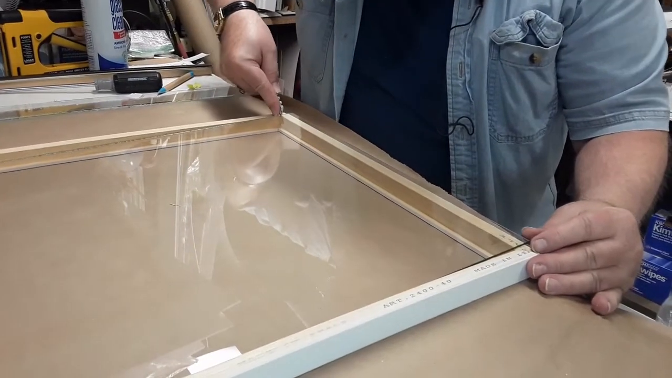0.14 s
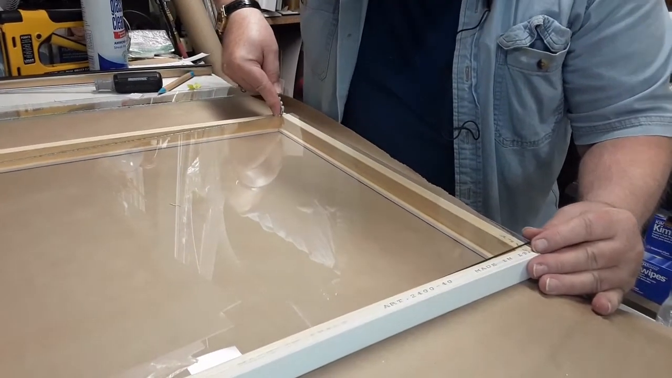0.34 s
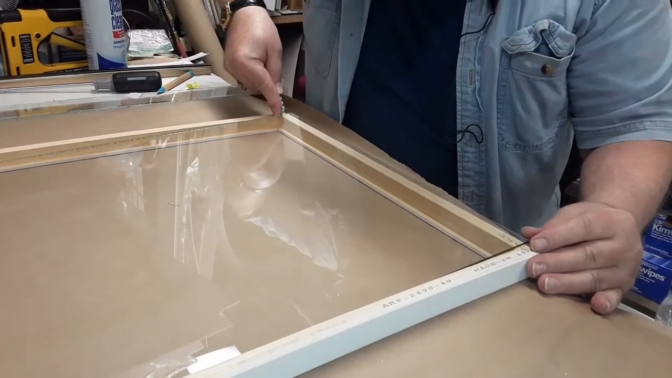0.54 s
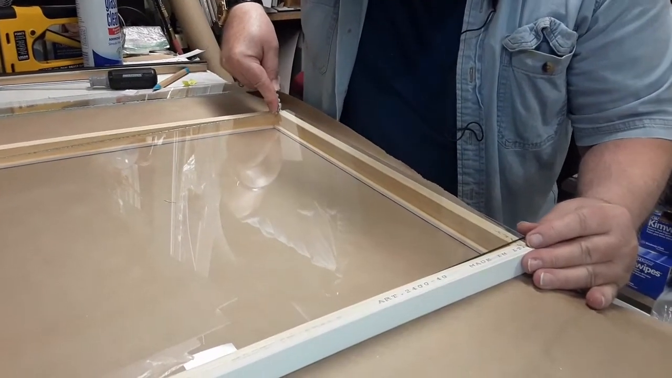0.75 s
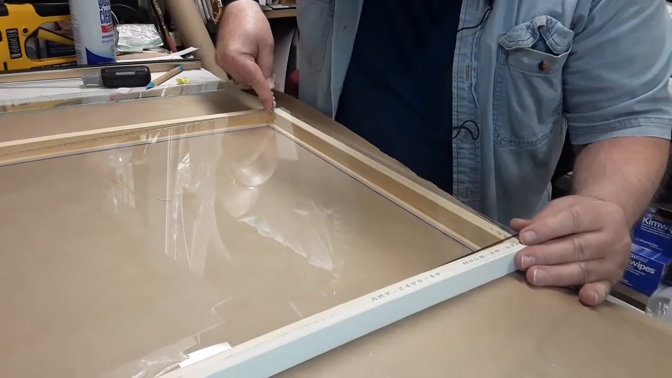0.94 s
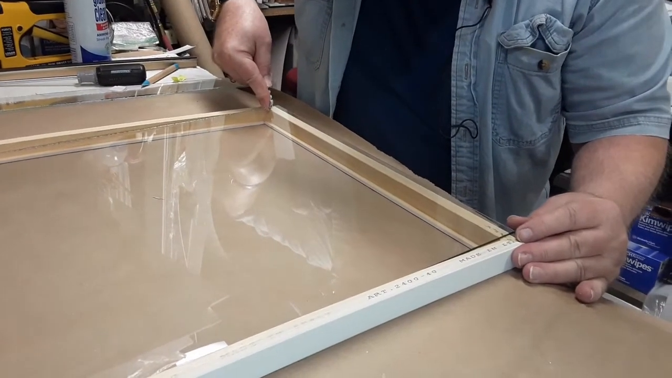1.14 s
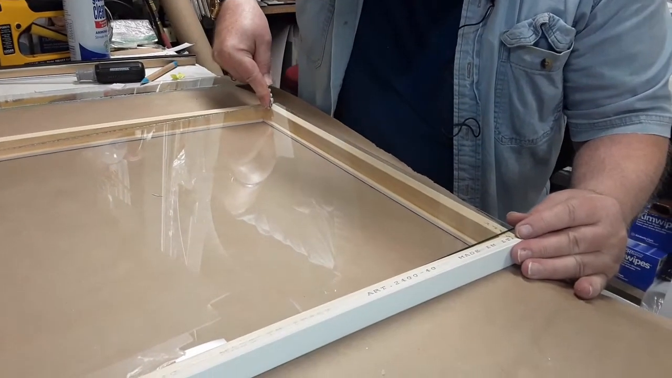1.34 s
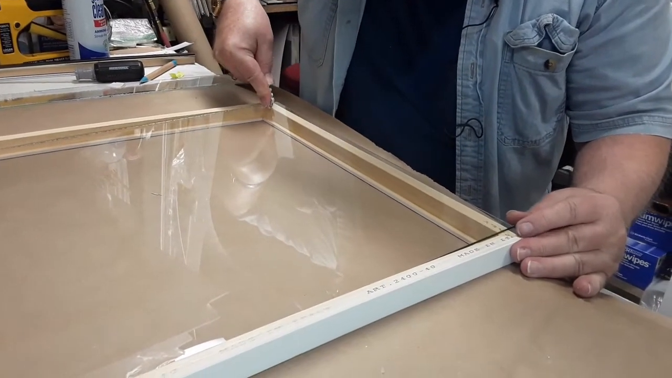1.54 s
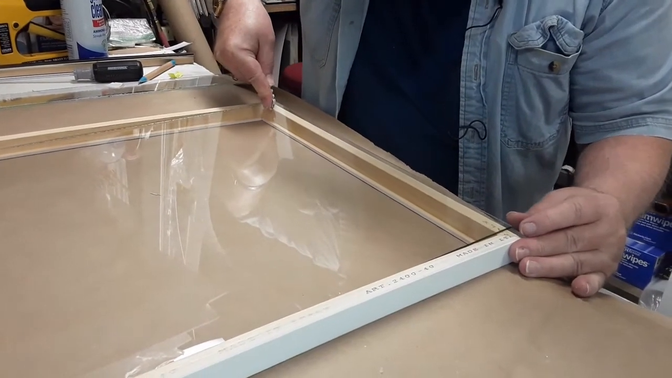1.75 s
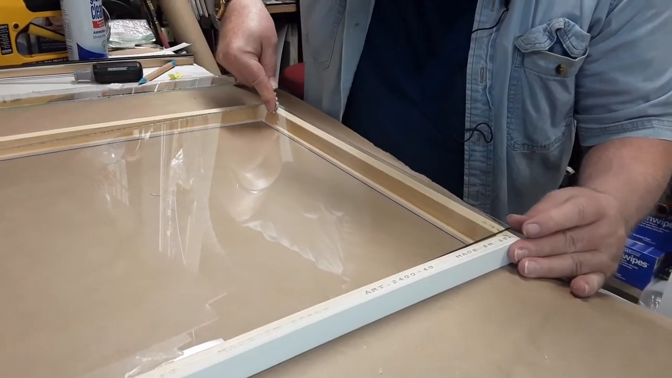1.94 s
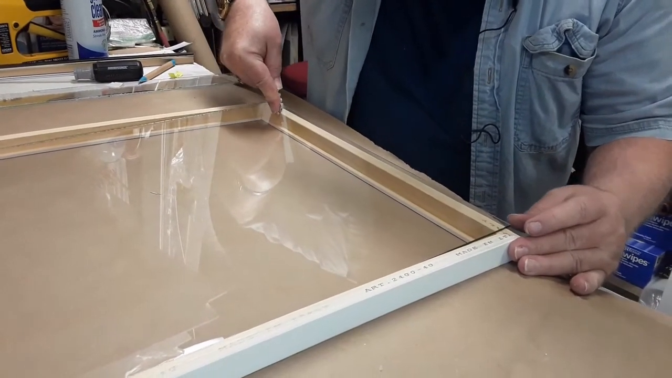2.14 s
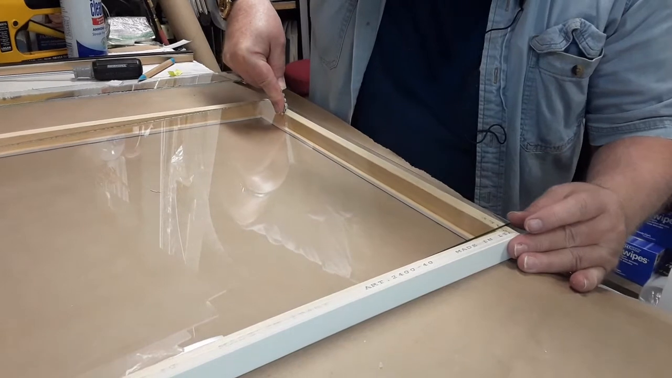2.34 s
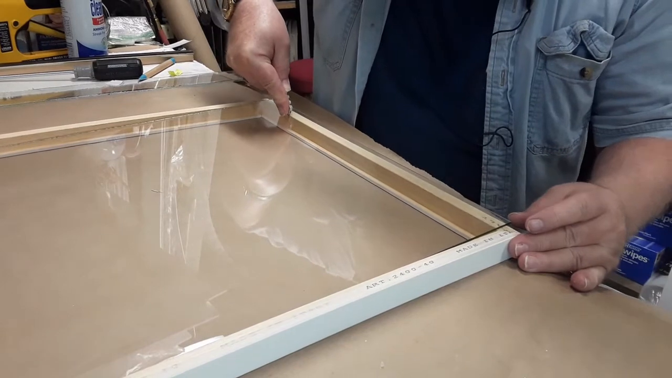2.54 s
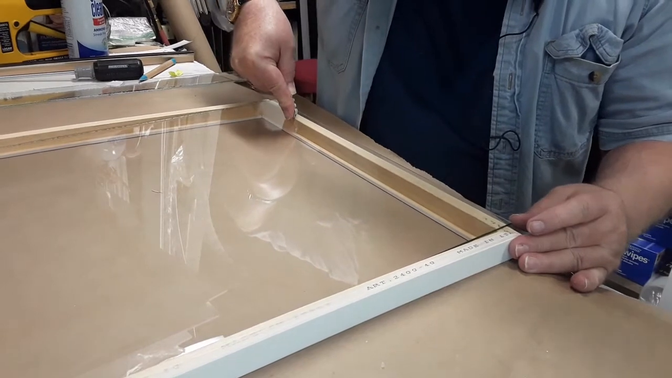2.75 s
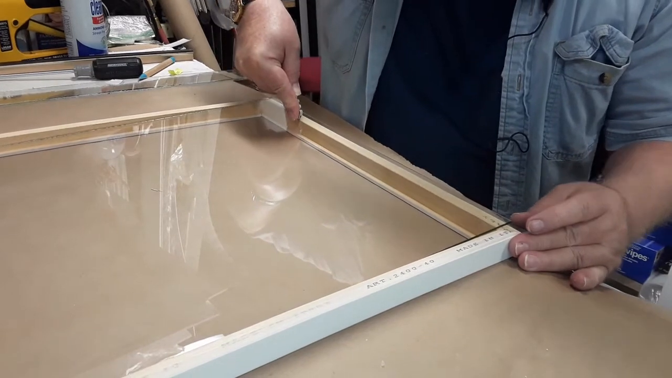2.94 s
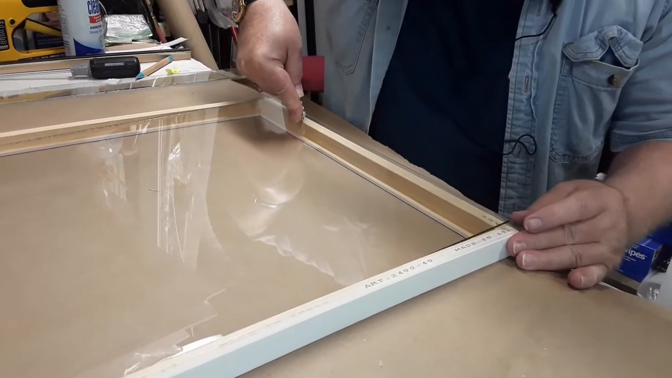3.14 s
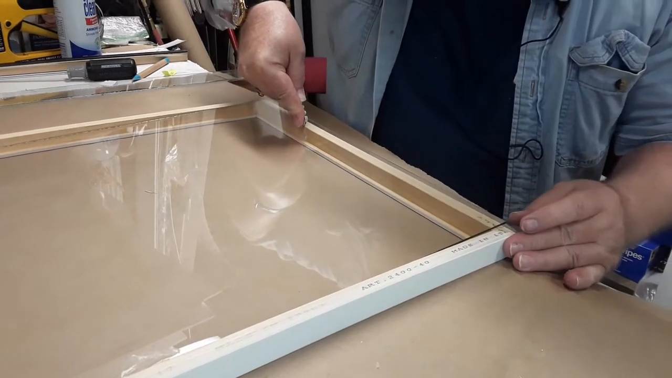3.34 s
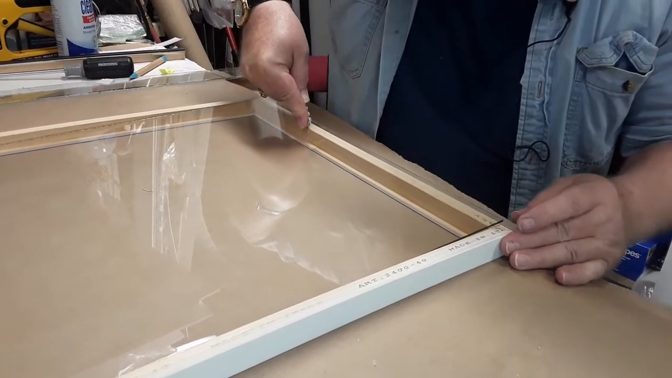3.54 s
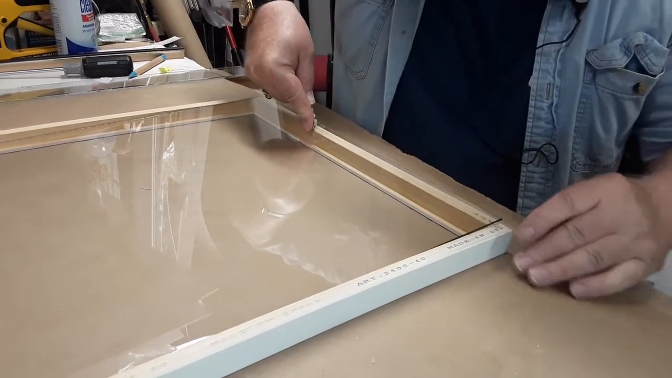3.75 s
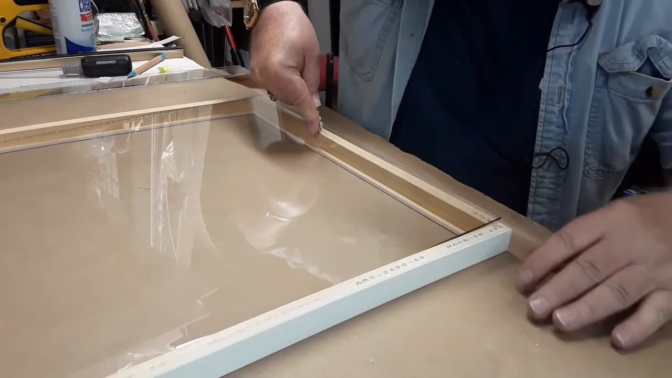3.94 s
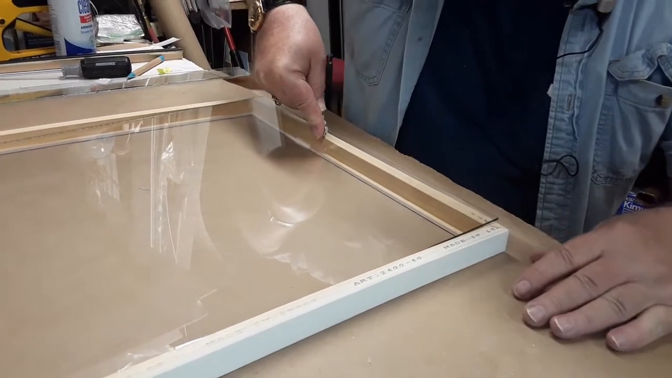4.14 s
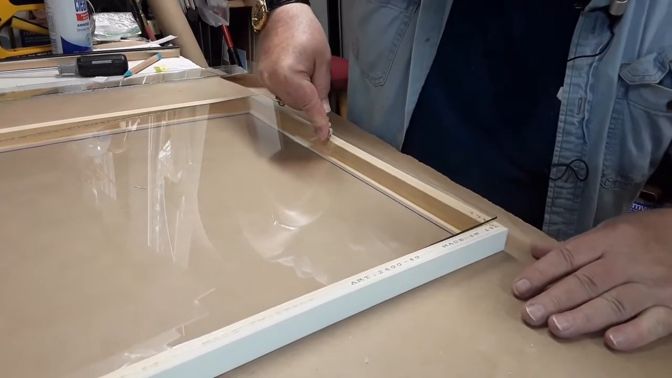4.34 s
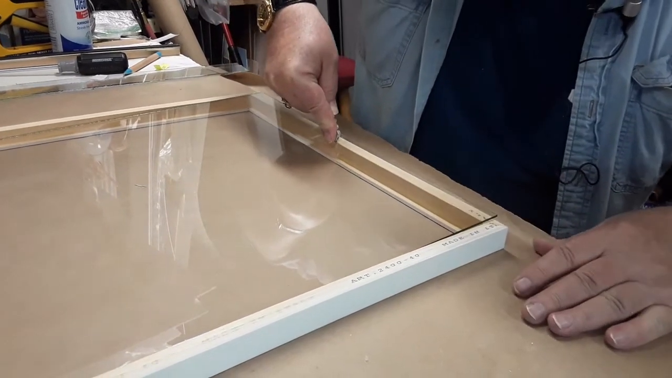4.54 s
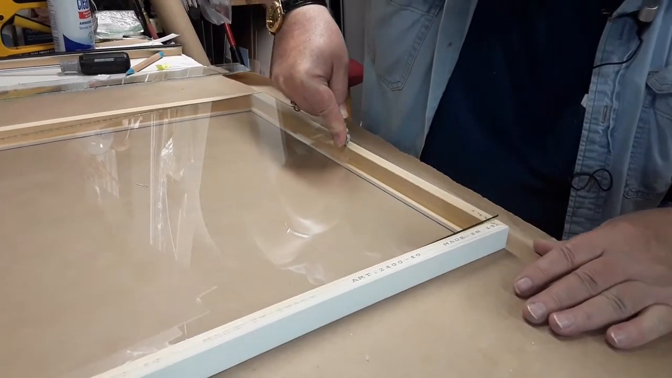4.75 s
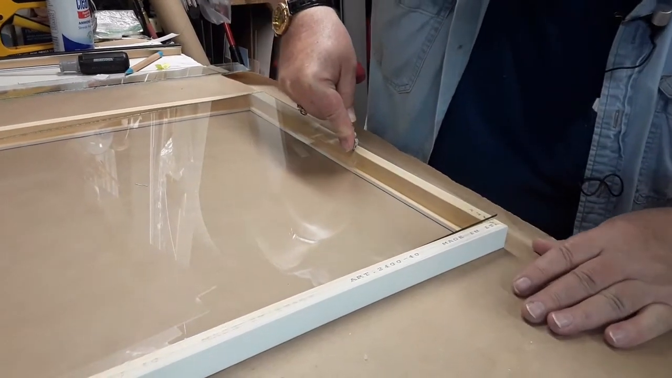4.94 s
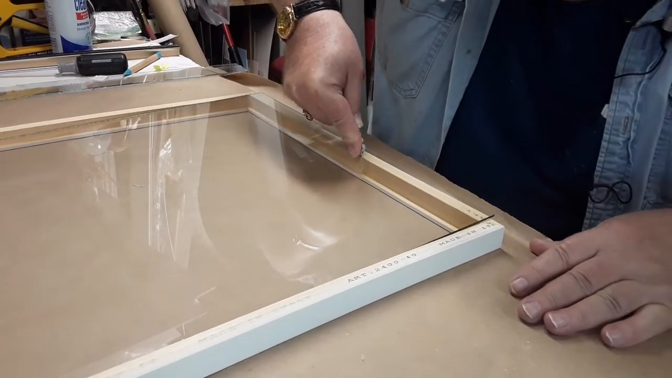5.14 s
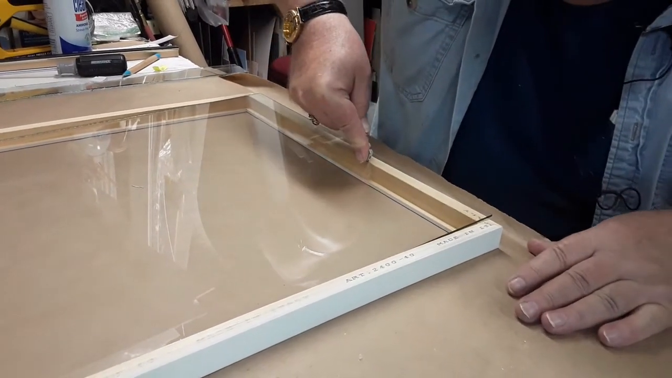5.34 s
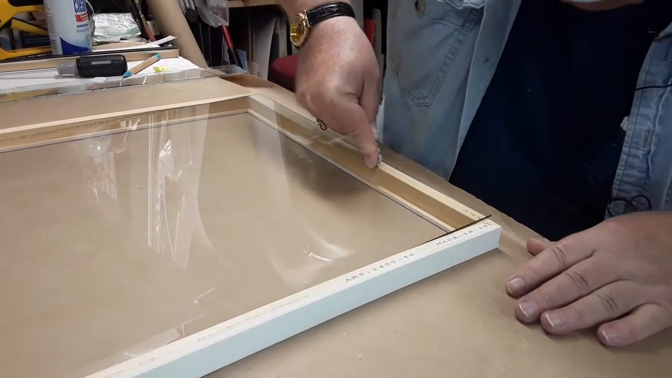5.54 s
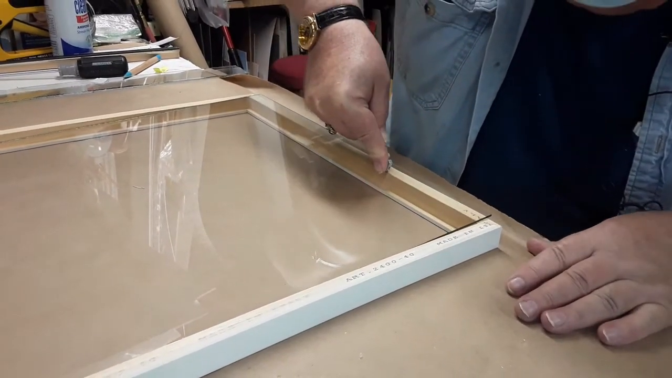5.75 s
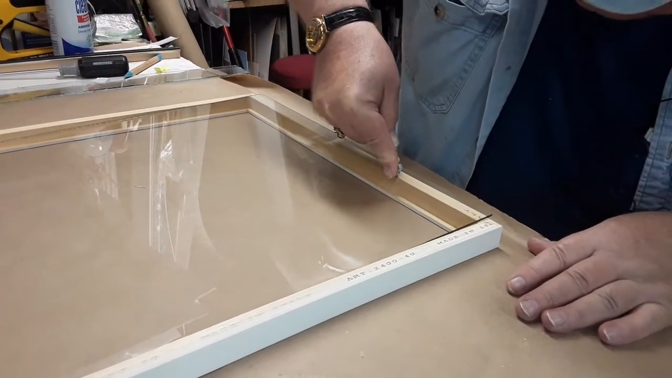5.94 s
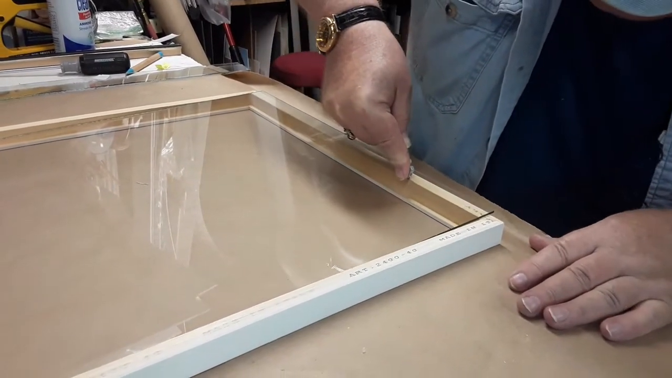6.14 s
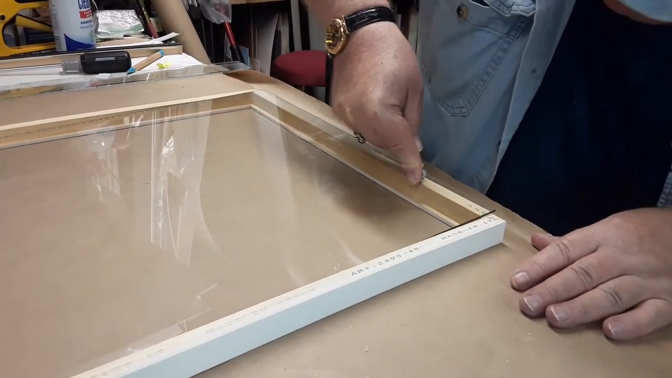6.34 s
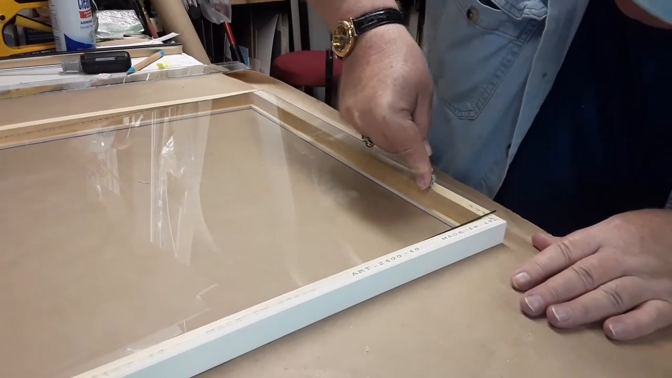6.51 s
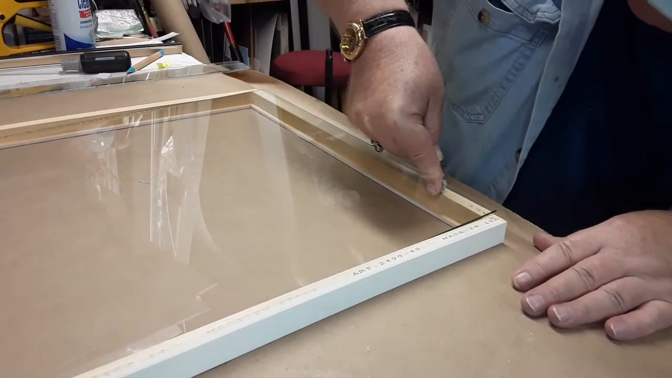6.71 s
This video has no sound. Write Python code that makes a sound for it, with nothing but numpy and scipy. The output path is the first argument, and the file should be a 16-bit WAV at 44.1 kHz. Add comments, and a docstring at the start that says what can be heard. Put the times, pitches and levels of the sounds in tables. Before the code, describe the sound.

A glass cutter ticks against a pane, then scores it with a long, gritty, high hiss over a faint workshop hum.

```python
"""Scoring a pane of glass

A hand-held glass cutter bites into a pane on a workbench. Its wheel first moves in separate slips,
then runs on as a hiss of tiny cracks that stalls and judders. The cracks make the pane ring, and the
tone pulses and swirls as the wheel travels. Now and then the glass chirps under the load or knocks
on the bench. A motor and a fan hum in the small workshop."""
import sys
import numpy as np
from scipy import signal
from scipy.fft import rfft, irfft
from scipy.io import wavfile
from scipy.ndimage import uniform_filter1d

SR = 44100
rng = np.random.default_rng(int(sys.argv[2]) if len(sys.argv) > 2 else 0)


def dump_mix(stems):
    """Bounce the given channels to the path in sys.argv[1] as a 16-bit WAV at rate SR."""
    frames = np.atleast_2d(stems).T  # one column per channel
    limited = np.clip(frames, -1, 1)  # hard clip at full scale
    pcm = np.round(limited * 32767).astype(np.int16)
    wavfile.write(sys.argv[1], SR, pcm)


N = 298878
TIME = np.arange(N) / SR
CREEP_START_S, RUN_START_S = 1.55, 1.819  # the wheel starts to creep, then to run

# the wheel bites and stops again: (time [s], length [s], relative level [dB])
WHEEL_SLIPS = [(0.247, 0.0041, -63), (0.583, 0.0032, -43.5), (0.729, 0.016, -32.5), (0.747, 0.007, -32),
               (0.867, 0.0029, -29), (0.873, 0.0048, -30), (1.171, 0.0039, -34.5), (1.187, 0.017, -35.5),
               (1.268, 0.0084, -35), (1.289, 0.0088, -33.5), (1.383, 0.023, -33), (1.418, 0.025, -30),
               (1.451, 0.0071, -29), (1.5305, 0.0056, -27.5), (1.584, 0.0063, -27.5), (1.6057, 0.0035, -29),
               (1.6743, 0.004, -26.5), (1.681, 0.0055, -29.5), (1.704, 0.013, -24.5), (1.7215, 0.0066, -32),
               (1.7345, 0.004, -27), (1.747, 0.007, -27), (1.763, 0.006, -30), (1.771, 0.0047, -24.5),
               (1.791, 0.0034, -27)]
# the strength of the running stroke: (time [s], relative level [dB])
STROKE_LEVEL = [(1.83, -26), (1.9, -26), (1.93, -27), (2.21, -25), (2.89, -27), (3.0, -25.5), (3.25, -26.5),
                (5.3, -25.5), (5.57, -25.5), (5.64, -25), (6.65, -26), (6.77, -24.5)]
# the wheel catches for a moment: (time [s], length [s])
WHEEL_STALLS = [(1.834, 0.0066), (1.919, 0.0046), (1.974, 0.01), (2.035, 0.014), (2.075, 0.0088),
                (2.575, 0.0095), (2.598, 0.013), (2.634, 0.0075), (2.889, 0.018), (2.916, 0.0083),
                (3.059, 0.0085), (3.736, 0.0095), (3.806, 0.01), (3.918, 0.0092), (4.122, 0.0072),
                (4.227, 0.0074), (4.864, 0.007), (5.909, 0.008), (6.143, 0.0084), (6.251, 0.0083),
                (6.536, 0.007)]
# how much the wheel judders: (time [s], depth [0-1])
JUDDER_DEPTH = [(1.8, 0.3), (2.9, 0.56), (3.1, 0.83), (3.5, .42), (3.8, 0.5), (5, 0.42), (6.75, 0.76)]
# where the wheel is: (time [s], distance from the starting edge [m])
WHEEL_PATH = [(0, .036), (1.5, .037), (1.8, .038), (2.2, .0562), (2.6, .0812), (3, .1013), (3.5, .1261),
              (4, .1568), (5, .2259), (5.5, .2634), (6, .2964), (6.4, .3258), (6.8, .3517)]
# the pane's broad tone colour: (pitch [Hz], relative level [dB])
PANE_COLOUR = [(470, -65), (800, -25), (1570, -12.5), (1970, -9), (2380, -10.5), (3380, -6), (4630, -17.5),
               (5110, -9.5), (5940, -7.5), (6570, -4.5), (7360, -5), (8440, 2), (10200, -14),
               (12000, -15.5), (16000, -28.5)]
# its sharper rings and the hollows between them: (pitch [Hz], width [Hz], lift [dB])
PANE_RINGS = [(1840, 90, 2), (2020, 110, 2.5), (2390, 90, -3.5), (2680, 60, -3), (2818, 70, 5.5),
              (3247, 50, 2.5), (3440, 110, 3.5), (5235, 140, 3), (6110, 110, -3.5), (6300, 80, 2.5),
              (6700, 140, 7), (7320, 130, -4), (7495, 50, 3.5), (7850, 180, 2.5), (8530, 140, 5),
              (8770, 90, 4), (9070, 60, 2.5), (9470, 90, 2.5), (10400, 250, -5), (10920, 130, 8),
              (11380, 110, 6), (11700, 90, 4), (12050, 110, 6), (13850, 400, -6), (14400, 400, 3)]
# standing waves that the wheel crosses: (lowest pitch [Hz], highest pitch [Hz], crest spacing [m],
# place of one crest [m], swing near an edge [dB], swing mid-pane [dB], mean near an edge [dB],
# mean mid-pane [dB])
STANDING_WAVES = [(1850, 2300, .0565, .0425, 2.1, 1, -.6, .6), (2650, 3100, .0543, .036, 1.2, .5, -1.6, .8),
                  (3150, 3750, .0495, .041, .5, 2.3, -2.2, 1.3), (5000, 5900, .0302, .0111, 1.6, 1, 0, 0),
                  (7400, 8250, .0239, .0117, 2, 2.6, -.7, .9)]
# swells around the 6.7 kHz ring: (time [s], lift [dB])
LOW_RING_SWELL = [(1.86, 6), (2.02, 5.5), (2.14, -4.5), (2.38, 4), (2.62, -4.0), (2.9, 8), (3.14, -3.5),
                  (3.34, 2.5), (3.94, -2), (4.1, 4.5), (4.46, 1), (4.9, 4), (5.06, 1.5), (5.46, 1),
                  (5.7, 0), (5.94, 1), (6.34, 1.5), (6.5, -6), (6.62, -0.5), (6.77, 4.5)]
# swells around the 8.6 kHz ring: (time [s], lift [dB])
HIGH_RING_SWELL = [(1.86, 0.5), (1.98, -7), (2.14, 1.0), (2.38, -3), (2.58, 1.5), (2.82, -3.5), (2.98, 2.5),
                   (3.14, 3.5), (3.26, -3), (4.14, 1.0), (4.62, -5.5), (4.78, -0.5), (4.98, -5),
                   (5.14, 2.5), (5.3, -4), (5.46, 0), (5.58, -3), (5.86, 2.5), (5.98, -5), (6.1, -2),
                   (6.34, -2), (6.5, -0.5), (6.66, -9), (6.77, 3)]
# swells of the top treble: (time [s], lift [dB])
TREBLE_SWELL = [(1.86, -0.5), (2.02, 1), (2.3, 0), (2.42, 0.5), (2.86, -0.5), (3.02, -1), (3.18, 0.5),
                (3.82, 1.5), (4.14, -1), (5.14, 2), (5.34, -2), (5.54, 1.5), (5.74, -2.5), (5.98, 1.5),
                (6.42, 0.5), (6.58, 2.5), (6.77, -3.5)]
# the pane ticks under the load: (time [s], peak level [dB], middle pitch [Hz], sweep time [s])
PANE_CHIRPS = [(1.287, -27.5, 1970, 0.0063), (1.3453, -33, 2170, 0.0042), (2.446, -25.5, 1680, 0.0026),
               (3.184, -21, 1860, 0.0035), (3.284, -26.5, 1810, 0.005), (3.310, -30, 1880, 0.0047),
               (3.478, -27, 1610, 0.0033), (3.885, -27, 1510, 0.0025), (4.121, -24, 1610, 0.0036),
               (4.365, -18, 2120, 0.0017), (5.2603, -25, 1870, 0.002)]
# dull knocks on the bench: (time [s], level [dB], lowest pitch [Hz], highest pitch [Hz], decay [s])
BENCH_KNOCKS = [(0.583, -36, 900, 2400, 0.022), (3.148, -25, 780, 1220, 0.0039)]
# the tones of the motor's hum: (pitch [Hz], level [dB], waver [dB])
MOTOR_TONES = [(59.2, -59.5, -3), (101.4, -54.5, 2), (139.7, -44.5, -0.6), (177.6, -58.5, 3),
               (204.2, -52.5, 3), (291, -64, 2), (759, -59.5, 2), (931, -60.5, 2), (1029, -56.5, 0),
               (1864, -59.5, 1.5)]
# the fan's tone swells and sinks: (time [s], level [dB])
FAN_LEVEL = [(0, -61), (.6, -52), (2, -51.5), (3.4, -52.5), (4, -63), (6.8, -57)]
# faint gliding tones: (time [s], length [s], first pitch [Hz], last pitch [Hz], top level [dB])
GLIDING_TONES = [(.37, .28, 492, 445, -51), (.5, .15, 598, 628, -54)]
# the tone colour of moving air: (pitch [Hz], relative level [dB])
AIR_COLOUR = [(20, -21), (35, -25), (55, -8), (90, -2), (200, 3.5), (280, -1.5), (380, 1), (500, -1.5),
              (750, -4), (1050, -1), (1400, -6), (2000, -14), (3600, -24), (6200, -45), (8300, -34),
              (10500, -52), (16000, -52)]


def wheel_slips():
    """The wheel's first bites: each opens with a sharp snap and goes on as a short crackle."""
    bite_db, settle_s, first_snap_db = 3, 0.0046, 10
    loudness = sum(undb(db + bite_db * np.exp(-abs(TIME - start) / settle_s))
                   * gate(start, length, 0.00024) for start, length, db in WHEEL_SLIPS)
    grit = unit(snaps(scatter=.25, uneven_db=1) + undb(6) * fractures(spread_db=1.5, crush_db=1.5))
    slips = undb(-1) * loudness * grit
    for start, _, db in WHEEL_SLIPS:
        slips[int(start * SR)] += undb(db + first_snap_db)
    body = band(slips, 1920, 2150)  # a bite from rest sounds fuller than the running wheel
    return slips + undb(3.5) * body


def wheel_run():
    """The rolling wheel cracks the glass, stalls and jumps on, over a steady hiss of glass dust."""
    stall_db, hitch_db, jump_db, settle_s = -15, -4, 1, 0.015
    rolling = gate(RUN_START_S, N / SR, 0.00045)
    stalled = np.clip(sum(gate(start, length - .002, 0.003) for start, length in WHEEL_STALLS), 0, 1)
    freed = sum((TIME > start + length) * np.exp(-abs(TIME - start - length) / settle_s)
                for start, length in WHEEL_STALLS)
    level_db = curve(STROKE_LEVEL) + stall_db * stalled + jump_db * freed + hitch_db * hitches()
    loudness = undb(level_db - 0.15) * judder(curve(JUDDER_DEPTH))
    grit = unit(snaps(scatter=.4, uneven_db=.6) + undb(5) * fractures(spread_db=1, crush_db=2))
    dust = unit(band(rng.standard_normal(N), 10500, 16000))
    return rolling * (loudness * grit + undb(-50) * dust)


def snaps(scatter, uneven_db, per_second=470):
    """The wheel breaks the glass in sharp snaps, a little uneven in spacing and size."""
    gaps, sizes = rng.standard_normal((N // 40, 2)).T
    starts = (np.cumsum(np.exp(scatter * gaps)) * SR / per_second).astype(int)
    return unit(np.bincount(starts, undb(uneven_db * sizes), N)[:N])


def fractures(spread_db, crush_db, per_second=9000):
    """Tiny cracks of uneven size over the fine noise of crushed glass."""
    cracks = (rng.random(N) < per_second / SR) * rng.choice([-1, 1], N)
    sizes = undb(spread_db * np.clip(rng.standard_normal(N), -2, 2))
    return unit(unit(cracks * sizes) + undb(crush_db) * rng.standard_normal(N))


def hitches(per_second=10, length_s=0.0044):
    """The wheel catches briefly at random moments; 1 while it is held."""
    starts = (rng.random(N) < per_second / SR).astype(float)
    width = int(length_s * SR)
    held = np.clip(width * uniform_filter1d(starts, width), 0, 1)
    return uniform_filter1d(held, SR // 1000)


def judder(depth, rate_hz=110, scatter=.35, uneven_db=-1.3):
    """The wheel sticks and slips: each uneven cycle swells quickly and dies down."""
    cycles = np.cumsum(rate_hz * np.exp(scatter * wander(rate_hz))) / SR
    size = undb(uneven_db * rng.standard_normal(N))[cycles.astype(int)]
    bursts = unit(size * np.sin(np.pi * np.sqrt(cycles % 1)) ** 2)
    force = 1 - depth + depth * bursts
    return force / np.sqrt(uniform_filter1d(force ** 2, SR // 24))  # keep the average level steady


def edge_echoes(force, distance, strength=1.1, reach_m=1.6, paths=60):
    """Waves return from the edges along paths that change as the wheel moves, so the tone swirls."""
    size, hop = 4096, 1024  # work on short, overlapping slices of sound
    starts = np.arange(-hop, N, hop)
    padded = np.pad(force, (hop, size))
    slices = np.array([padded[s + hop:s + 3 * hop] for s in starts]) * signal.get_window("hann", 2 * hop)
    place = distance[np.clip(starts + hop, 0, N - 1)]
    hz = np.arange(size // 2 + 1) * SR / size
    # the glass bends in waves that travel 400 m/s at 8 kHz; higher ones go faster
    radians_per_m = 2 * np.pi * np.sqrt(hz * 8000) / 400
    lengths = .35 - reach_m * np.log(1 - (np.arange(paths) + rng.random(paths)) / paths)
    growths = rng.choice([-1, 1], paths, p=[.25, .75]) * rng.uniform(.5, 2, paths)  # most paths grow
    echoes = 0
    for length, growth in zip(lengths, growths):
        phase = np.outer(length + growth * (place - place.mean()), radians_per_m).astype(np.float32)
        echoes = echoes + np.cos(phase) - 1j * np.sin(phase)
    depth = strength * np.minimum(place / .11, 1)  # the swirl is full 0.11 m from the edge
    response = 1 + depth[:, None] * echoes / np.sqrt(paths)
    # the echoes only move energy between pitches about 700 Hz apart or less
    bins = int(700 * size / SR)
    nearby_power = uniform_filter1d(abs(response) ** 2, bins, axis=1)
    response /= np.sqrt(uniform_filter1d(nearby_power, bins // 2, axis=1))
    out = np.zeros(N + 2 * size)
    for start, echoed in zip(starts + hop, irfft(rfft(slices, size) * response)):
        out[start:start + size] += echoed
    return out[hop:hop + N]


def pane_ringing(force, size=8192):
    """The glass rings at its own pitches after each crack."""
    hz = np.arange(size // 2 + 1) * SR / size
    rings_db = sum(lift / (1 + (2 * (hz - pitch) / width) ** 2) for pitch, width, lift in PANE_RINGS)
    gain = undb(colour_db(PANE_COLOUR, hz) + rings_db)
    # turn these gains into a ring that starts at the crack, never before it
    cepstrum = irfft(np.log(gain))[:size // 2]
    ring = irfft(np.exp(rfft(2 * cepstrum, size)))
    return signal.fftconvolve(force, ring / np.linalg.norm(ring))[:N]


def standing_waves(sound, distance, pane_m=0.421, edge_zone_m=0.12):
    """Each group of rings swells as the wheel crosses a crest of its wave and sinks between crests."""
    from_edge = np.minimum(distance, pane_m - distance)
    inside = .5 + .5 * np.tanh((from_edge - edge_zone_m) / 0.022)  # 0 near an edge, 1 mid-pane
    out = sound
    for lo_hz, hi_hz, spacing, crest, edge_swing, mid_swing, edge_db, mid_db in STANDING_WAVES:
        wave = np.cos(2 * np.pi * (distance - crest) / spacing)
        lift_db = (1 - inside) * (edge_db + edge_swing * wave) + inside * (mid_db + mid_swing * wave)
        out = out + (undb(lift_db) - 1) * band(sound, lo_hz, hi_hz, order=4)
    return out


def ring_swells(sound):
    """The two strongest rings and the top treble swell and sink once the wheel is moving."""
    moving = np.clip((TIME - CREEP_START_S) / (RUN_START_S - CREEP_START_S), 0, 1)

    def swell(table, lo_hz, hi_hz):
        return (undb(moving * curve(table)) - 1) * band(sound, lo_hz, hi_hz, order=4)

    rings = swell(LOW_RING_SWELL, 6350, 7050) + swell(HIGH_RING_SWELL, 8300, 9000)
    return sound + rings + swell(TREBLE_SWELL, 10500, 13000)


def chirps(fall=0.77):
    """The pane ticks under the load. High waves cross it first, so each tick sweeps down."""
    out = np.zeros(N)
    for start, db, hz, sweep_s in PANE_CHIRPS:
        age = np.arange(SR // 30) / SR / sweep_s  # counted in sweep times
        pitch = hz * (1 + fall) / (1 + fall * 2 * age) ** 0.96
        loudness = undb(db) * 2 * age * np.exp(.5 - 2 * age ** 2)
        first = int(start * SR)
        out[first:first + len(age)] += loudness * sliding_tone(pitch)
    return out + undb(-13) * reverb(out, fade_s=.045)


def knocks():
    """The frame and the pane knock on the wooden bench, which damps them quickly."""
    return sum(undb(db) * gate(start, .1, 0.0019) * np.exp(-abs(TIME - start) / decay)
               * unit(band(rng.standard_normal(N), lo_hz, hi_hz))
               for start, db, lo_hz, hi_hz, decay in BENCH_KNOCKS)


def thud(start_s=6.0555, first_hz=1400, sweep_s=0.0064, decay_s=0.016):
    """The pane bumps the bench once: the middle pitches arrive first and the bass last."""
    age = np.clip(TIME - start_s, 0, None)
    pitch = first_hz / (1 + age / sweep_s) ** 2
    loudness = undb(-27) * gate(start_s, 0.0106, 0.00096) * np.exp(-age / decay_s)
    return loudness * sliding_tone(pitch * (age > 0))


def workshop(fan_hz=559.4, whine_hz=14030):
    """A motor's wavering hum, a fan, a thin electrical whine and faint glides over the rush of air."""
    hum = sum(undb(db + waver_db * wander(14)) * wavering_tone(hz, 0.11 * waver_db, 4.2)
              for hz, db, waver_db in MOTOR_TONES)
    fan = undb(curve(FAN_LEVEL)) * wavering_tone(fan_hz, 0.11, 2.5)
    whine = undb(-82) * wavering_tone(whine_hz, 3, 30)
    glides = sum(undb(db) * gate(start, length / 2, length / 2)
                 * sliding_tone(np.interp(TIME, [start, start + length], [first_hz, last_hz]))
                 for start, length, first_hz, last_hz, db in GLIDING_TONES)
    spectrum = rfft(rng.standard_normal(N))
    spectrum *= undb(colour_db(AIR_COLOUR, np.arange(len(spectrum)) * SR / N))
    air = unit(irfft(spectrum, N)) * undb(-43 + 0.8 * wander(5.4))
    return np.sqrt(2) * (hum + fan + whine + glides) + air  # sqrt(2) gives a sine an rms of 1


def reverb(sound, fade_s):
    """Dense echoes, as strong as the sound itself, that die away by 60 dB in fade_s."""
    age = np.arange(SR // 2) / SR
    echoes = rng.standard_normal(len(age)) * undb(-60 * age / fade_s) * (age > .001)
    return signal.fftconvolve(sound, echoes / np.linalg.norm(echoes))[:N]


def wavering_tone(hz, drift_radians, per_second):
    """A pure tone that drifts a little ahead of and behind its steady beat."""
    return np.sin(2 * np.pi * hz * TIME + drift_radians * wander(per_second))


def sliding_tone(hz):
    """A pure tone that follows a changing pitch."""
    return np.sin(2 * np.pi * np.cumsum(hz) / SR)


def wander(per_second):
    """A smooth random curve of typical size 1 that heads for a new value per_second times a second."""
    step = int(SR / per_second)
    points = rng.standard_normal(N)[:N // step + 2]
    joined = np.interp(np.arange(N) / step, np.arange(len(points)), points)
    return unit(uniform_filter1d(joined, step // 2 + 1))


def gate(start, length, ramp_s):
    """A switch that ramps up to 1 from start and back to 0 once length has passed."""
    return np.clip((TIME - start) / ramp_s, 0, 1) * np.clip((start + length - TIME) / ramp_s + 1, 0, 1)


def band(sound, lo_hz, hi_hz, order=2):
    """Keep the pitches between two limits, without delaying them."""
    return signal.sosfiltfilt(signal.butter(order, [lo_hz, hi_hz], "band", fs=SR, output="sos"), sound)


def curve(table):
    """Join (time, value) points with straight lines."""
    return np.interp(TIME, *np.transpose(table))


def colour_db(table, hz):
    """The level at each pitch, joining (pitch, level) points on a log scale."""
    pitches, db = np.transpose(table)
    return np.interp(np.log(hz + 1), np.log(pitches), db)


def undb(db):
    """Turn decibels into a gain."""
    return 10 ** (np.asarray(db) / 20)


def unit(x):
    """Scale to an average size (rms) of 1."""
    return x / np.sqrt(np.mean(x ** 2))


def scene():
    """The wheel drives the pane; the bench and the room echo it over the workshop's hum."""
    distance = curve(WHEEL_PATH)
    force = edge_echoes(wheel_slips() + wheel_run(), distance)
    ringing = ring_swells(standing_waves(pane_ringing(force), distance))
    glass = ringing + chirps() + knocks() + thud()
    bench = undb(-11.5) * reverb(glass, fade_s=0.15)
    room = undb(-13.5) * reverb(glass, fade_s=0.27)
    return (glass + bench + room + workshop())[None]


def record(dry):
    """Cut the treble above 15.9 kHz."""
    return signal.sosfilt(signal.ellip(10, .2, 70, 15900, fs=SR, output="sos"), dry)


dry = scene()
out = record(dry)
dump_mix(out)
```